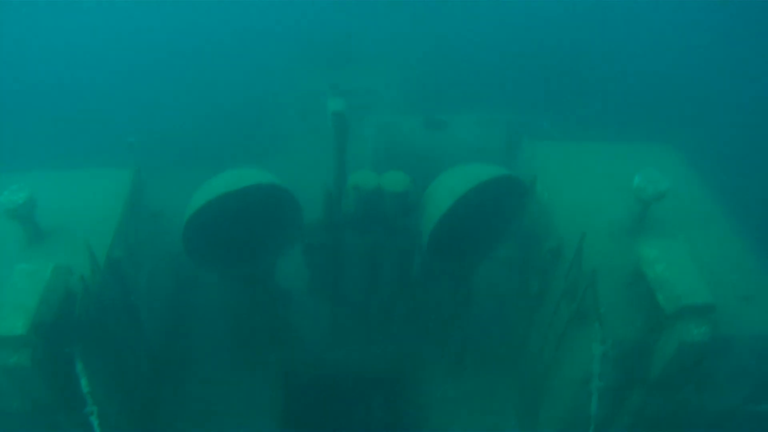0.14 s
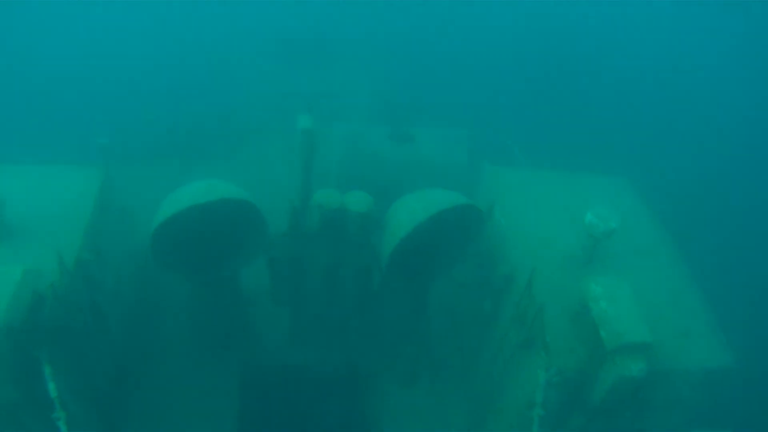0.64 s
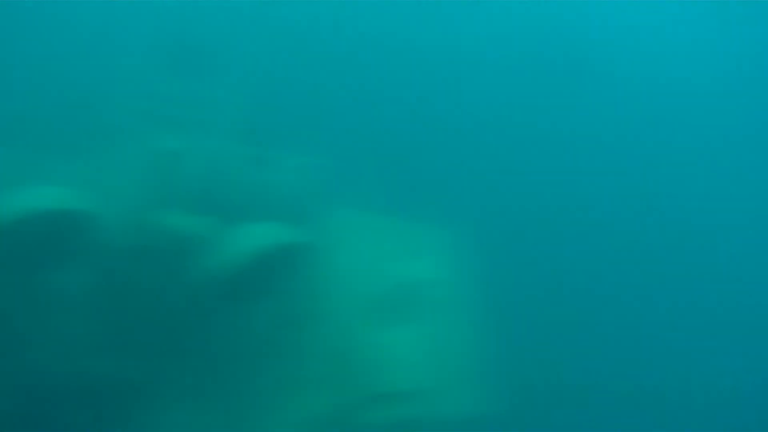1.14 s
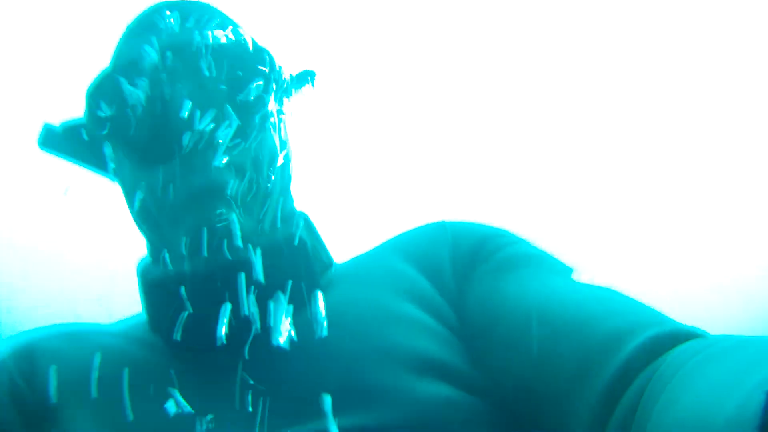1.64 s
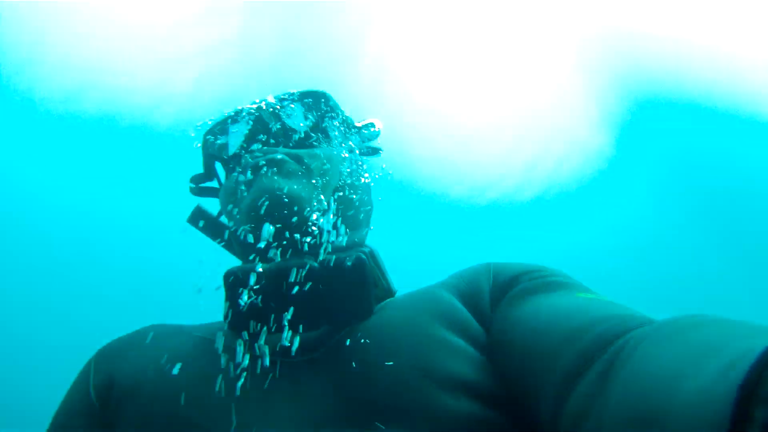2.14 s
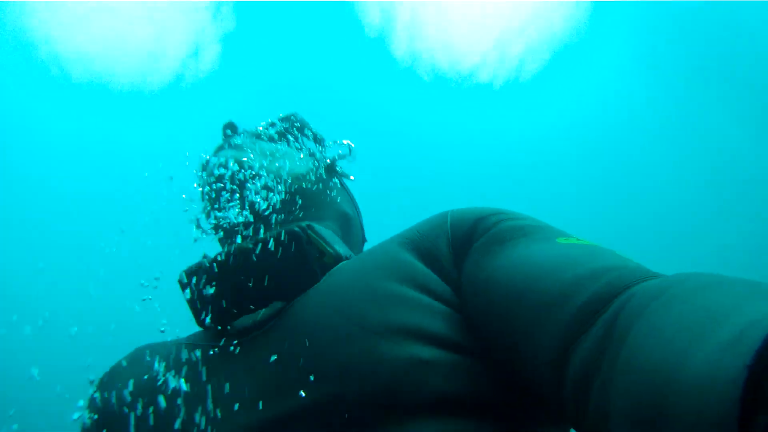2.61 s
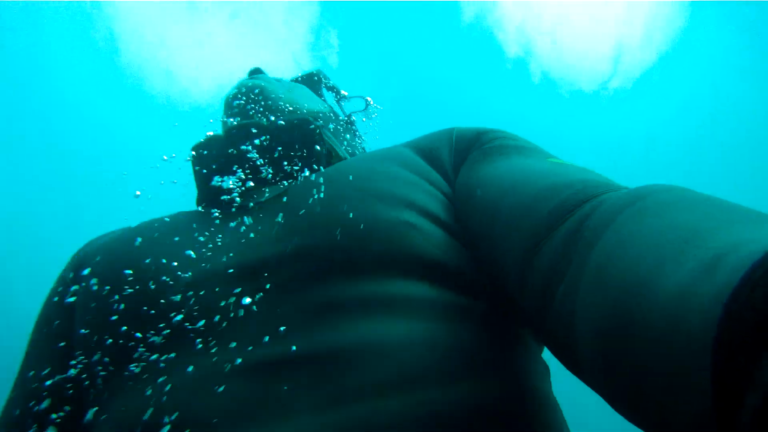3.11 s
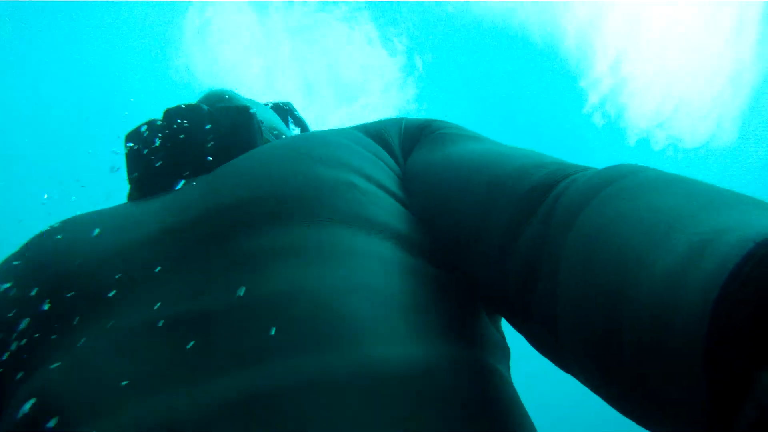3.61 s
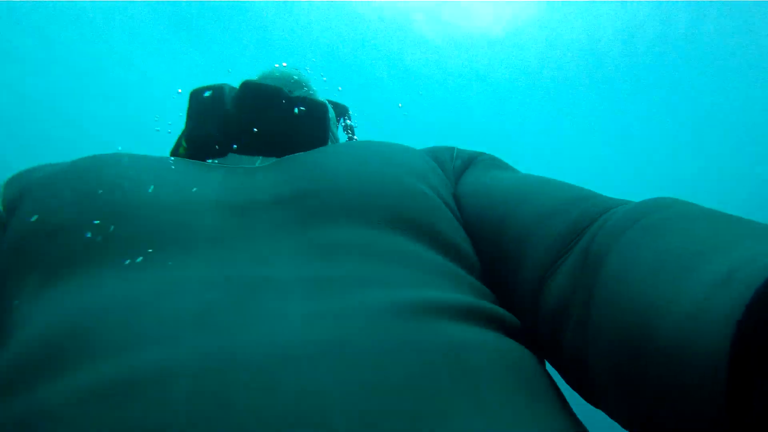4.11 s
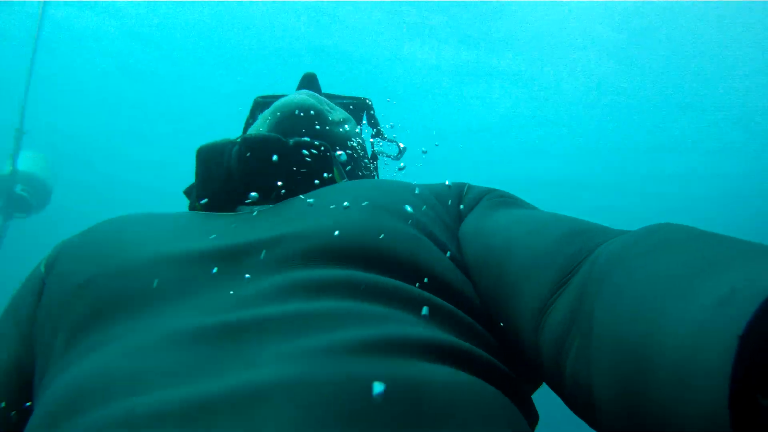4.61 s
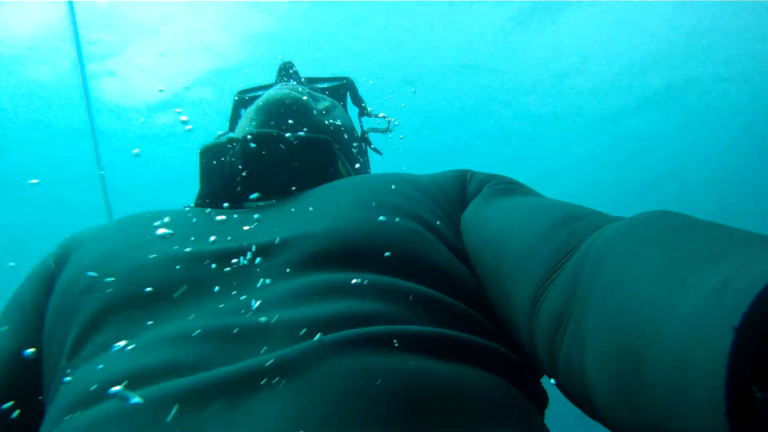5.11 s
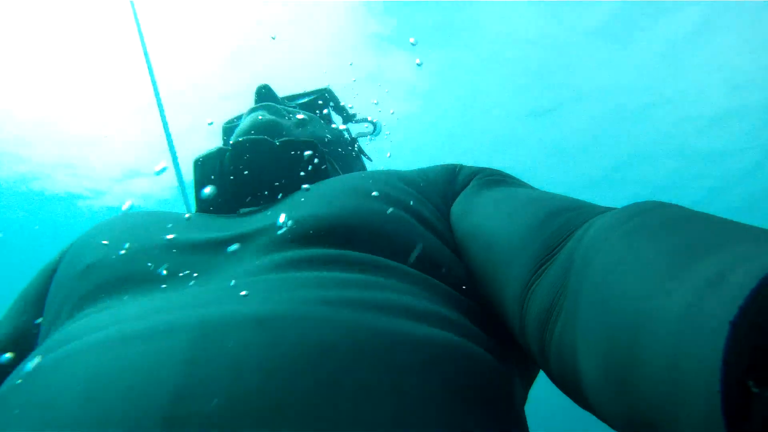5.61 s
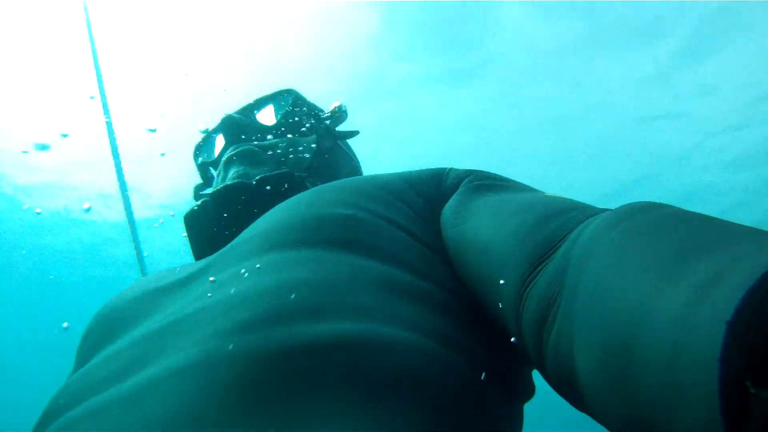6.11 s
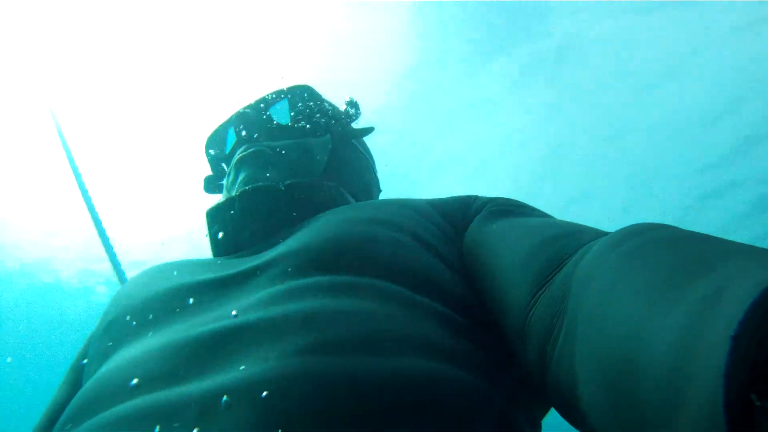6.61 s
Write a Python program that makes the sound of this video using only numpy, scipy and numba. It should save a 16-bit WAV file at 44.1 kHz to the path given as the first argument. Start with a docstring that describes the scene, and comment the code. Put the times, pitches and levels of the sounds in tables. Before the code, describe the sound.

Muffled underwater sound from inside a sealed camera housing, slightly grainy and metallic as if slowed down. From 0 to 1.1 s there is quiet low flow rumble, faint hiss and thin wash, with small bubble blips, most clustered around 0.6-0.7 s, and a creak near 0.65 s. At about 1.2 s a rush of water swells as the camera swings; from 1.3 to 1.7 s it is loud, rough and surging, with low thumps, a sharp pop near 1.38 s and the hardest knocks at about 1.5 s, then more clacks around 1.6 s. By 1.8 s it collapses to far quieter trickling. Until about 6.7 s, scattered watery plips, fizzes and shell ticks continue over low rumble, with a brighter bubble near 3.5 s, rubbery creaks around 4.1 and 5.5 s, and dull gulps near 3.0, 4.95, 5.5 and 5.9 s. A short fizz and soft gulp come at 6.6 s.

```python
"""Open water: a diver rises holding a camera in a sealed housing, played back in slow motion.
Coloured noise makes the rumble of flow on the shell and a steady hiss; noise with random impulses, shaped
in bands, makes the wash of water, the creak of the rubber suit and fizzing patches of spray, trickle, wash
and scuffs. Decaying sines make the bubbles, the gulps of air and the ticks of the shell. A fast swing of
the camera drives a loud rush of water and knocks against the housing."""
import sys
import numpy as np
from scipy import signal
from scipy.fft import rfft, irfft
from scipy.io import wavfile
from scipy.ndimage import uniform_filter1d
from numba import njit

SR = 44100
rng = np.random.default_rng(int(sys.argv[2]) if len(sys.argv) > 2 else 0)


def volts_from_decibels(level):
    """Turn decibel levels (scalar or array-like) into linear amplitude factors."""
    exponent = np.asarray(level, float) / 20
    return 10 ** exponent


def master(y):
    """Save y as 16-bit WAV."""
    cut = np.clip(np.atleast_2d(y).T, -1, 1)
    pcm = np.round(cut * 32767)  # scale
    wavfile.write(sys.argv[1], SR, pcm.astype(np.int16))


N = 297675  # samples in the scene


def curves(rows):
    """Piecewise-linear control: each column after the time, interpolated at every sample."""
    s, *columns = np.transpose(rows)
    return [np.interp(np.arange(N) / SR, s, column) for column in columns]


def unit(x):
    """Power normalisation: scales a signal to rms 1."""
    return x / np.sqrt(np.mean(x ** 2))


def coloured(points):
    """Spectral shaping: white noise weighted by (Hz, dB) points, linear in dB over log frequency."""
    hz, db = np.transpose(points)
    f = np.maximum(np.fft.rfftfreq(N, 1 / SR), 1)
    weight = volts_from_decibels(np.interp(np.log(f), np.log(hz), db))
    return unit(irfft(rfft(rng.standard_normal(N)) * weight, N))


def resonate(x, modes):
    """Modal superposition: steep band-pass resonances (Hz, width Hz, dB) added with alternating sign."""
    out = 0
    for k, (hz, width, db) in enumerate(modes):
        b, a = signal.iirpeak(hz, hz / width, SR)
        mode = signal.lfilter(b, a, signal.lfilter(b, a, x))  # two passes steepen the skirts
        # a narrow band passes less noise power, so it is raised
        out = out + (-1) ** k * volts_from_decibels(db) * mode * np.sqrt(1000 / width)
    return out


def walk(rate):
    """Slow random modulation: levels held 1 / rate seconds and slewed twice, with a spread near 1."""
    k = int(SR / rate)
    held = np.repeat(rng.standard_normal(N // k + 1), k)
    return 1.4 * uniform_filter1d(uniform_filter1d(held, k), k)[:N]


@njit
def rings(count, s, size, hz, t60, rise, glide):
    """Damped oscillation: sines that swell over rise (s), decay 60 dB in t60 (s) and slide by glide."""
    out = np.zeros(count)
    for e in range(len(s)):
        start, n = int(s[e] * SR), int(t60[e] * SR) + 1
        z, gap = size[e] + 0j, 1.
        step = 2 * np.pi * hz[e] / SR
        p = np.exp(1j * step - np.log(1000) / n)  # one sample of rotation and decay
        turn = np.exp(1j * step * (glide[e] - 1) / n)  # pitch slide per sample
        close = np.exp(-1 / (rise[e] * SR))
        for i in range(min(n, count - start)):
            z, p, gap = z * p, p * turn, gap * close
            out[start + i] += (1 - gap) * z.imag
    return out


def clicks(per_s, spread_db):
    """Impulsive excitation: randomly timed impulses of either sign, most small and a few large."""
    when, sign, size = rng.random((N, 3)).T
    impulses = (when < per_s / SR) * np.sign(sign - .5)
    return unit(impulses * volts_from_decibels(-spread_db * np.log(size + 1e-3)))


def rumble():
    """Flow noise: water moving over the shell is heard as noise weighted to the lowest frequencies."""
    # Each row: frequency in Hz, relative level in dB per Hz.
    rumble_spectrum = [(15, -6.5), (40, 0.5), (90, -7), (200, -17), (500, -34), (1000, -56)]
    return coloured(rumble_spectrum)


def hiss():
    """Stationary noise: a steady hiss whose spectrum has several peaks and dips."""
    # Each row: frequency in Hz, relative level in dB per Hz.
    hiss_spectrum = [(240, -37), (400, 1), (512, -11), (760, -8.5), (1170, -11.5), (1630, -16.5),
                     (2070, -6), (2400, -19), (2650, -31.5), (2870, -24.5), (3550, -18.5), (4260, -21.5),
                     (5270, -22), (5900, -39), (7670, -69), (13000, -120)]
    return volts_from_decibels(-61.5) * coloured(hiss_spectrum)


def wash(tilt_db):
    """Band-wise modulated noise: water and grit beat on the shell; bands surge together and flicker alone.
    The tilt is in dB per octave about 2 kHz."""
    # Water heard through the shell. Each row: frequency in Hz, relative level in dB per Hz.
    shell_spectrum = [(180, -40), (300, -15.5), (441, -22.5), (506, -17), (674, -17), (834, -9), (910, -18),
                      (1100, -6), (1270, -6), (1950, 0), (2290, -6), (3370, -7.5), (4210, -17.5),
                      (4890, -16.5), (5900, -32), (7670, -62), (13000, -120)]
    hz, db = np.transpose(shell_spectrum)
    beat = unit(rng.standard_normal(N) + 0.63 * clicks(1000, 2.5))
    f = np.fft.rfftfreq(N, 1 / SR)
    spectrum = rfft(beat) * volts_from_decibels(np.interp(np.log(f + 1), np.log(hz), db))
    pitch = np.log2(f / 2000 + 1e-9)  # octaves from 2 kHz
    surge = 1.62 * walk(110)  # dB, common to all bands
    out = 0
    for octave in np.arange(-3, 2, .5):
        share = np.clip(1 - abs(pitch - octave) / .5, 0, 1)  # overlapping triangular bands
        flicker = 1.46 * walk(70)  # dB, this band alone
        out = out + volts_from_decibels(surge + flicker + tilt_db * octave) * irfft(spectrum * share, N)
    return out / np.std(irfft(spectrum, N))


def bubbles():
    """Bubble pulsation: a dense trickle of small bubbles, each ringing briefly near a mode of the shell."""
    # Pitches that the shell passes best, in Hz.
    passed_hz = np.array([1700, 2000, 2100, 2250, 3350, 3500, 5000])
    when, which, length, softness = rng.random((3000, 4)).T
    scatter = .06 * rng.standard_normal(3000)  # octaves
    hz = passed_hz[(which * len(passed_hz)).astype(int)] * 2 ** scatter
    size = volts_from_decibels(-17 * softness - 2.3 * np.log2(hz / 2000))
    t60 = (12 + 55 * length) / hz  # 12 to 67 cycles
    return unit(rings(N, when * N / SR, size, hz, t60, 1.9 / hz, 1.02 + 0 * hz))


def creak():
    """Stick-slip friction: stretching rubber slips unevenly and excites low resonances."""
    # Each row: resonance in Hz, width in Hz, relative level in dB.
    rubber_modes = [(235.6, 86, -1.5), (340, 87, -4), (422, 84, -7.5)]
    slips = clicks(500, 2.46) + 0.84 * rng.standard_normal(N)
    return unit(resonate(slips, rubber_modes))


def fizzing_patches():
    """Band-limited noise: fizzing patches of spray, trickle, wash and scuffs with soft edges.
    Some are short; one is a long faint band near 800 Hz."""
    # Each row: start in seconds, length in seconds, level in dB (rms before the fades),
    # centre in Hz and width in octaves (before the upper edge is capped).
    patches = [(0, 0.067, -52.5, 2000, 1.7), (0.886, 0.072, -49, 1760, 1), (1.055, 0.036, -47.5, 2000, 1.3),
               (1.4, 0.074, -43, 5000, 0.49), (1.54, 0.071, -41, 5000, 0.28),
               (1.668, 0.084, -39, 4500, 0.31), (1.846, 0.15, -45.5, 1730, 0.5),
               (2.057, 0.035, -47, 1410, 1.44), (2.276, 0.082, -60, 2200, 1),
               (2.414, 0.036, -48, 1910, 0.35), (2.833, 0.076, -49.5, 1710, 0.6),
               (3.324, 0.055, -51.5, 2100, 1.5), (3.33, .04, -51.5, 3280, 0.27),
               (3.318, 0.053, -62, 5030, 0.8), (0.576, 0.023, -50, 1400, 0.68),
               (4.062, 0.49, -54, 844, 0.69), (4.51, 2.24, -64.5, 790, 0.26),
               (5.045, 0.11, -56.5, 3470, 0.13), (5.18, .15, -55.5, 2140, 0.18),
               (4.215, 0.032, -59, 5000, 0.21), (5.41, .045, -54, 3000, 0.5), (5.415, .04, -60, 4500, 0.28),
               (6.617, 0.073, -59, 2960, 0.44), (5.397, 0.07, -47, 1840, 0.51),
               (5.844, .035, -54.5, 2100, 0.13), (5.982, 0.039, -51, 2100, 0.23),
               (6.61, 0.067, -43.5, 1860, 0.34)]
    crackle = clicks(1200, 4.1) + 0.53 * rng.standard_normal(N)
    out = np.zeros(N)
    for s, length, db, hz, octaves in patches:
        a, n = int(s * SR), int(length * SR)
        edges = np.minimum(hz * 2 ** (np.array([-.5, .5]) * octaves), 5900)
        band_pass = signal.butter(2, edges, "bandpass", fs=SR, output="sos")
        band = signal.sosfilt(band_pass, crackle[a:a + n])
        out[a:a + n] += volts_from_decibels(db) * unit(band) * signal.windows.tukey(n, .35)
    return out


def pings():
    """Free bubble oscillation: each pinches off with a snap, rings and beats with a weaker neighbour."""
    # Single bubbles. Each row: start in seconds, level in dB (before each part's offset),
    # starting pitch in Hz, time to decay 60 dB in seconds.
    single_bubbles = [(0.253, -38, 1280, 0.036), (0.331, -36.5, 1230, 0.028), (0.381, -44, 1280, 0.071),
                      (0.498, -45, 1390, 0.055), (0.578, -40, 1287, 0.076), (0.615, -32.5, 1162, 0.077),
                      (0.647, -28, 1016, 0.075), (0.693, -35, 910, 0.13), (1.064, -37, 1045, 0.027),
                      (0.1521, -37.5, 1770, 0.021), (0.2064, -36.5, 2540, 0.028),
                      (0.2533, -34, 2550, 0.019), (0.3082, -39.5, 1770, 0.035), (0.377, -39, 2400, 0.028),
                      (0.5008, -42, 1670, 0.034), (0.5781, -45, 1590, 0.03), (0.616, -37, 1530, 0.036),
                      (0.6444, -32.5, 2570, 0.024), (0.6679, -34.5, 2250, 0.037),
                      (0.6928, -29.5, 2100, 0.04), (0.7771, -42.5, 1530, 0.033), (0.9093, -35, 1850, 0.02),
                      (0.9268, -27.5, 1700, 0.015), (1.0605, -46, 1730, 0.024), (1.061, -36, 1990, 0.021),
                      (1.377, -9.5, 1950, 0.029), (1.491, -0.5, 843, 0.017), (.175, -46.5, 4700, .015),
                      (.585, -48, 2980, .025), (.675, -49.5, 4600, .02), (.696, -43, 3380, .02),
                      (.708, -40, 3600, 0.011), (.822, -48, 3300, 0.025), (.83, -43, 1510, 0.063),
                      (.855, -46, 1570, 0.054), (3.551, -31, 2037, 0.043), (3.568, -37, 2100, .04),
                      (1.7908, -41, 1920, 0.035), (1.8337, -38, 1680, 0.048), (1.8855, -35, 1790, 0.027),
                      (1.897, -27.5, 1790, 0.028), (1.9579, -41, 1570, 0.029), (2.0661, -37, 1990, 0.029),
                      (2.1864, -42.5, 1620, 0.032), (2.2133, -34, 2040, 0.021),
                      (2.2996, -37.5, 1940, 0.045), (2.4283, -47, 1230, 0.02), (2.4283, -34, 2170, 0.015),
                      (2.5386, -45.5, 2260, 0.098), (2.6733, -37.5, 2280, 0.023),
                      (2.6932, -38, 2100, 0.038), (2.8469, -42, 2070, 0.04), (2.8733, -38, 1973, 0.045),
                      (2.9486, -41, 1840, 0.035), (3.0065, -33.5, 1960, 0.042), (3.0409, -41, 2280, 0.063),
                      (3.0604, -39, 2020, 0.059), (3.0738, -37, 1700, 0.068), (3.1926, -39.5, 1960, 0.035),
                      (3.3218, -40, 1700, 0.031), (3.3343, -38, 2010, 0.052), (3.3532, -36, 1870, 0.033),
                      (3.3971, -40, 2140, 0.028), (3.452, -39, 2060, 0.035), (3.5109, -42, 2100, 0.04),
                      (3.5353, -23.5, 2113, 0.044), (3.6091, -40.5, 1890, 0.031),
                      (3.7358, -37.5, 2060, 0.046), (4.1888, -40, 2060, 0.028), (4.2392, -41, 1730, 0.018),
                      (4.546, -44, 1900, 0.02), (4.6138, -57, 1350, 0.032), (4.748, -47, 1700, 0.032),
                      (4.8972, -51, 1170, 0.031), (4.8972, -35, 2130, 0.02), (4.9206, -36, 2130, 0.025),
                      (4.9441, -33, 1960, 0.019), (5.0134, -41, 2250, 0.073), (5.0982, -44, 2090, 0.035),
                      (5.1312, -27, 2060, 0.012), (5.209, -37.5, 1950, 0.037), (5.2599, -37.5, 2050, 0.027),
                      (5.4016, -37.5, 1530, 0.044), (5.428, -35, 2100, 0.071), (5.6136, -39, 2100, 0.041),
                      (5.8391, -43.5, 2180, 0.048), (5.9952, -49, 1950, 0.035),
                      (6.0626, -44.5, 2390, 0.037), (6.2042, -41, 1820, 0.039),
                      (6.2806, -40.5, 2000, 0.029), (6.6108, -35, 2040, 0.035), (6.6293, -38, 1750, 0.033),
                      (1.7723, -29.5, 3400, 0.017), (1.8965, -32, 3280, 0.015), (1.9584, -45, 3150, 0.019),
                      (2.0661, -45, 3340, 0.025), (2.0831, -41, 3310, 0.025), (2.2996, -41, 3350, 0.02),
                      (2.5505, -49, 3520, 0.022), (2.6598, -46, 3120, 0.025), (2.8479, -49, 3400, 0.022),
                      (3.1726, -38.5, 3440, 0.031), (3.3357, -45, 3370, 0.021), (3.4161, -47, 3460, 0.018),
                      (3.5158, -44, 3150, 0.063), (3.5503, -40.5, 3480, 0.039), (4.2342, -44, 3490, 0.025),
                      (4.3499, -45.5, 3420, 0.046), (4.4053, -42, 3490, 0.024), (4.4452, -43, 3350, 0.036),
                      (4.546, -40, 3300, 0.011), (4.6837, -37.5, 3650, 0.017), (4.7475, -51, 3360, 0.019),
                      (4.8837, -52, 3500, 0.018), (4.8982, -28.5, 3500, 0.016), (4.9441, -39, 3300, 0.025),
                      (5.0389, -46, 3260, 0.025), (5.0538, -40.5, 3390, 0.048),
                      (5.1147, -35.5, 3430, 0.021), (5.4639, -44, 3440, 0.035),
                      (5.9229, -43.5, 3530, 0.017), (6.6258, -43, 3160, 0.026),
                      (1.8337, -42.5, 5350, 0.013), (1.8965, -24.5, 4920, 0.006),
                      (2.2901, -45, 5085, 0.012), (2.547, -48, 5200, 0.012), (2.6757, -45, 5060, 0.014),
                      (2.7281, -43.5, 5230, 0.012), (2.7695, -44.5, 5200, 0.011),
                      (3.2589, -48, 5070, 0.012), (3.4884, -48, 4610, 0.012), (3.5298, -48, 4900, 0.015),
                      (3.5647, -42, 4835, 0.015), (4.2257, -43, 4620, 0.012), (4.532, -42, 4980, 0.011),
                      (4.6837, -37, 5180, 0.015), (4.8972, -54, 4940, 0.012), (5.3177, -46, 5540, 0.012),
                      (5.3402, -46, 4340, 0.016), (5.4075, -48, 4270, 0.011), (5.43, -40, 4300, 0.024),
                      (5.5188, -43.5, 5200, 0.013)]
    s, db, hz, t60 = np.transpose(single_bubbles)
    t60 = np.clip(t60, .004, .2)
    near_hz = hz * 2 ** (.12 * rng.standard_normal(len(s)))
    snap = rings(N, s, volts_from_decibels(db - 8.5), 1.4 * hz, 3.1 / hz, 0.34 / hz, 1.0 + 0 * s)
    ring = rings(N, s, volts_from_decibels(db + 2), hz, t60, 2.63 / hz, 0.974 + 0 * s)
    neighbour = rings(N, s + .004, volts_from_decibels(db - 6), near_hz, t60, 4.3 / hz, 0.85 + 0 * s)
    return snap + ring + neighbour


def gulps():
    """Heavily damped pulsation: large air pockets leaving the suit thump at low pitch for a few cycles."""
    # Each row: start in seconds, level in dB (before a common offset), pitch in Hz,
    # time to decay 60 dB in seconds.
    air_pockets = [(0.325, -46, 138, 0.06), (1.183, -52, 121, 0.049), (1.289, -26.5, 153, 0.053),
                   (1.339, -25, 156, 0.049), (1.421, -24, 210, 0.056), (1.485, -16.5, 196, 0.046),
                   (1.791, -43, 418, 0.06), (2.302, -32, 117, 0.068), (2.758, -42, 323, 0.056),
                   (2.804, -40, 402, 0.06), (2.987, -26, 208, 0.058), (3.854, -29, 166, 0.052),
                   (4.078, -31, 260, 0.043), (4.144, -38, 170, 0.06), (4.291, -37, 123, 0.091),
                   (4.587, -42, 160, 0.074), (4.893, -37, 242, 0.063), (4.945, -26, 182, 0.034),
                   (5.473, -20, 264, 0.033), (5.705, -40, 122, 0.049), (5.873, -38, 291, 0.095),
                   (5.915, -25.5, 295, 0.041), (5.969, -34.5, 322, 0.087), (6.615, -31.5, 158, 0.048),
                   (1.793, -35, 383, 0.036), (4.085, -35, 340, .05), (4.948, -35.5, 386, 0.035),
                   (5.476, -28, 303, 0.03)]
    s, db, hz, t60 = np.transpose(air_pockets)
    return rings(N, s, volts_from_decibels(db + 6.5), hz, t60, 1.1 / hz, 1.0 + 0 * s)


def ticks():
    """Impact excitation of modes: a hard tick sets all housing modes ringing; wide modes die sooner."""
    # Each row: start in seconds, level in dB (before the mode levels), brightness in dB.
    knocks = [(1.5102, 5.5, -14), (1.5142, 4, -6), (0.378, -43, 13), (0.5, -37, -3), (0.927, -27.5, -17),
              (1.585, -8.5, -7), (1.607, -4.5, -10), (1.63, -25, 2), (1.668, -21, 0), (1.897, -24.5, -4),
              (1.999, -34, 2), (2.3, -27.5, -5), (2.54, -43, 0), (3.259, -43, -4), (3.419, -40, 10),
              (3.564, -46, 4), (4.189, -42, -5), (4.24, -28.5, 1), (4.3, -34, 0), (4.546, -39.5, 4),
              (4.614, -33.5, -3), (4.761, -33.5, -13), (4.898, -32, -8), (4.944, -28.5, -9),
              (5.259, -38, -8), (5.427, -32, 12.5), (5.799, -47, 11)]
    # Each row: mode in Hz, width in Hz, relative level in dB.
    housing_modes = [(866, 280, -23.5), (1400, 410, -6), (1950, 680, 2), (2315, 1200, 0.5),
                     (3350, 540, -12), (5100, 1100, -7)]
    s, db, bright_db = np.transpose(knocks)
    out = 0
    for k, (hz, width, mode_db) in enumerate(housing_modes):
        size = volts_from_decibels(db + mode_db - 2 + (k > 3) * bright_db)  # brightness moves the top two modes
        out = out + rings(N, s, size, hz + 0 * s, 3.5 / width + 0 * s, .00015 + 0 * s, 1 + 0 * s)
    return out


def scene():
    """Linear superposition: all sources add at the microphone inside the housing."""
    # Water on the shell. Each row: time in seconds, rumble level in dB, suit creak level in dB,
    # wash level in dB (before tilt and surges), wash tilt in dB per octave, small bubble level in dB.
    flow = [
        [(0.0, -44, -77, -52, -2, -65), (0.16, -42, -59, -55, -5, -66), (0.31, -46, -74, -64, -8, -70),
         (0.326, -41, -59, -58, 3, -62), (0.422, -44.5, -71, -62, -5, -71), (0.48, -48.5, -69, -64, -4, -63),
         (0.524, -41, -82, -75, 1.5, -59), (0.658, -46.5, -48, -53.5, -6, -79),
         (0.732, -46.5, -77, -58, -8, -74), (0.864, -48.5, -77, -63, -2, -70), (0.96, -40, -65, -53, 2, -60),
         (0.998, -48, -77, -60, -1.5, -69), (1.06, -39, -55.5, -50.5, -1.5, -63),
         (1.124, -51, -63, -53.5, -1, -55), (1.15, -36.5, -65, -53.5, 1, -63)],
        [(1.8, -41, -41, -50.5, 1, -52), (1.87, -44.5, -75, -52.5, 0.5, -57),
         (2.02, -42.5, -62, -50.5, -1, -53), (2.06, -43, -55, -66, -9, -64), (2.27, -47, -58.5, -51, -4, -53.5),
         (2.31, -36, -44, -61, -1, -46), (2.38, -43.5, -67, -58.5, -4, -62), (2.43, -45.5, -58, -62, 2, -59),
         (2.49, -43, -72, -59, -1, -59), (2.53, -46, -57, -67, 4, -61), (2.54, -59, -66, -60, -1, -55),
         (2.63, -42, -44.5, -62, 6.5, -64), (2.7, -54, -45.5, -59, -5, -57), (2.78, -44, -50.5, -67, 4, -63),
         (2.83, -52, -44.5, -60, -1, -59), (2.94, -41, -58, -63, -3.5, -58.5), (3.01, -47, -47, -60, -10, -58),
         (3.04, -45.5, -64, -61, 2, -57), (3.23, -47, -53, -60.5, 6.5, -56), (3.27, -51, -56, -61, 10, -61),
         (3.34, -40.5, -53, -62, -11, -57.5), (3.56, -46, -74, -69, 9, -60), (3.58, -48.5, -66, -67.5, 10, -63),
         (3.72, -42, -52.5, -67, 1, -68), (3.89, -51, -56, -65, -3, -60.5), (3.95, -44.5, -64, -63, -12, -64),
         (3.99, -43, -70, -63.5, -8, -71), (4.09, -43, -36.5, -63.5, -12.5, -67),
         (4.13, -42, -56, -56, -5, -63), (4.21, -35.5, -69, -52, -9, -61), (4.28, -42.5, -59, -58, -10, -57.5),
         (4.47, -43.5, -52.5, -59.5, -5, -65), (4.52, -48, -73, -67, -3, -67),
         (4.6, -44.5, -51.5, -61.5, 3, -65), (4.83, -48.5, -57.5, -64, -1, -60.5),
         (4.96, -38.5, -47.5, -60, -4, -63), (4.98, -45, -56.5, -59, -0.5, -62),
         (5.3, -44.5, -55.5, -61.5, -8, -63), (5.33, -48, -56, -63, -11, -58), (5.4, -40, -66, -58, -7, -62),
         (5.44, -45.5, -63.5, -62, -6, -53), (5.48, -43.5, -38, -61, -4, -65), (5.54, -46, -74, -74, 1, -59),
         (5.58, -51, -57, -65, -5, -63), (5.71, -44, -51.5, -69, 3, -60.5), (5.8, -42, -58, -68, 4, -63.5),
         (5.89, -45, -43.5, -65, -1, -60.5), (6.02, -43, -42.5, -71, -1, -64), (6.03, -47, -42, -62, -3, -66),
         (6.14, -43, -66.5, -66.5, -4, -64), (6.53, -55, -49.5, -63.5, -1, -62.5),
         (6.69, -55, -52, -58, -10, -61), (6.75, -37.5, -68, -63, 8, -65)],
    ]
    # The fast swing, with the same columns; it falls between the two stretches of flow.
    swing = [
        [(1.17, -49.5, -61, -51, -1, -61), (1.194, -31.5, -71, -45.5, -0.81, -59),
         (1.232, -49, -74, -42.5, -0.4, -48), (1.288, -36, -53, -24.5, -0.9, -59),
         (1.3, -27.5, -49, -26.5, -1, -56)],
        [(1.31, -28, -53, -25.5, -0.8, -52), (1.322, -36, -43, -25.5, -1.2, -52),
         (1.354, -27, -45, -21, -1.4, -52), (1.384, -36, -56, -30, -1, -50), (1.4, -38, -33, -21, -0.85, -49)],
        [(1.41, -42, -36, -24, -1, -52), (1.432, -17.5, -32.5, -17.5, -0.42, -52),
         (1.456, -32, -54, -19, -0.34, -52), (1.47, -36, -46, -30, -1, -52)],
        [(1.48, -29, -38, -27.5, -1, -52), (1.49, -31.5, -36, -22.5, -1.2, -55),
         (1.505, -39, -33, -27.5, -1.1, -52)],
        [(1.524, -30, -39, -23, -0.88, -52), (1.55, -33, -47, -29.5, -0.79, -52)],
        [(1.56, -34, -44, -28, -0.65, -54), (1.576, -33, -48, -22.5, -0.38, -52),
         (1.612, -32, -46, -24, -0.7, -52), (1.62, -33, -57, -24.5, -0.89, -54.5)],
        [(1.63, -44, -62, -34.5, -0.85, -54), (1.64, -32.5, -54, -29.5, -0.68, -52),
         (1.658, -34, -42, -18.5, 0.12, -52), (1.69, -32, -44, -27.5, -0.42, -55)],
        [(1.7, -43, -47, -26.5, -0.65, -52), (1.72, -37, -47, -34.5, -0.42, -49),
         (1.742, -42, -53, -35, -0.77, -56)],
        [(1.752, -43, -47, -40, -1, -52), (1.768, -44, -58, -51, -0.86, -51), (1.79, -50, -39, -52, -1, -52)],
    ]
    rumble_db, creak_db, wash_db, tilt_db, bubble_db = curves(np.vstack([flow[0], *swing, flow[1]]))
    noise = volts_from_decibels(rumble_db) * rumble() + hiss()
    water = volts_from_decibels(wash_db) * wash(tilt_db) + volts_from_decibels(bubble_db) * bubbles() + pings() + gulps()
    return (noise + water + volts_from_decibels(creak_db) * creak() + fizzing_patches() + ticks())[None]


def band_limit(x):
    """A steep low-pass at the top of the band."""
    return signal.sosfilt(signal.butter(12, 16320, fs=SR, output="sos"), x)


def record(dry):
    """Spectral imaging: slow motion holds each sample four times, mirroring sound about 6 and 12 kHz."""
    held_rate, hold, top_hz = 12000, 4, 15350  # samples per second, repeats, low-pass edge in Hz
    slow = signal.resample(dry, N * held_rate // SR, axis=1)
    held = signal.resample(np.repeat(slow, hold, axis=1), N, axis=1)
    low_pass = signal.ellip(10, .2, 40, top_hz, fs=SR, output="sos")
    mix = np.clip(signal.sosfilt(low_pass, held), -1, 1)
    return band_limit(mix)


dry = scene()
out = record(dry)
master(out)
```